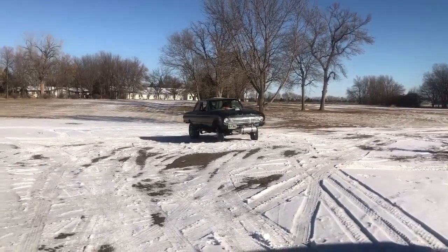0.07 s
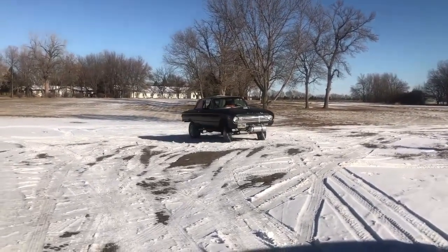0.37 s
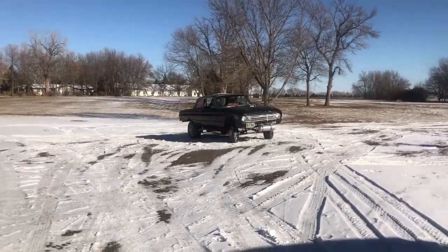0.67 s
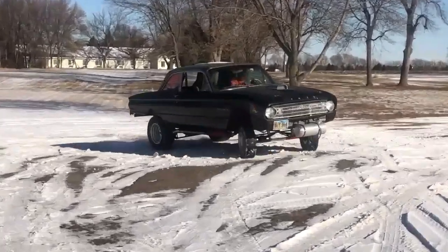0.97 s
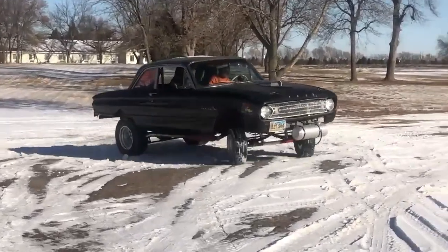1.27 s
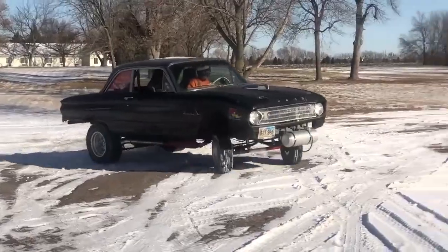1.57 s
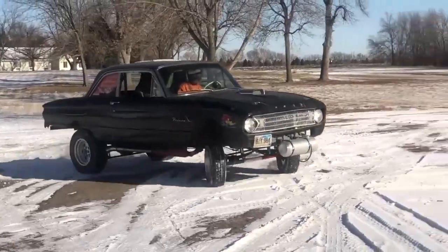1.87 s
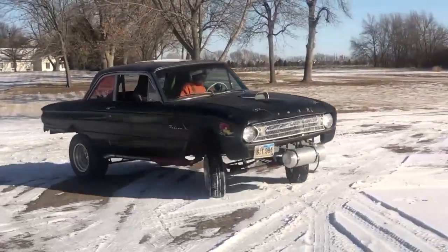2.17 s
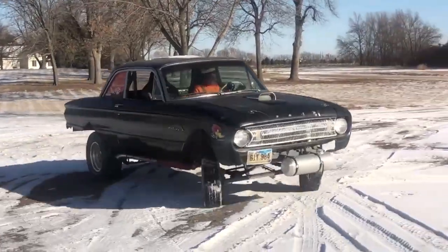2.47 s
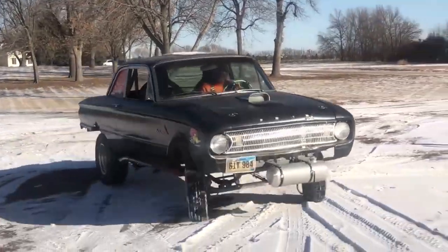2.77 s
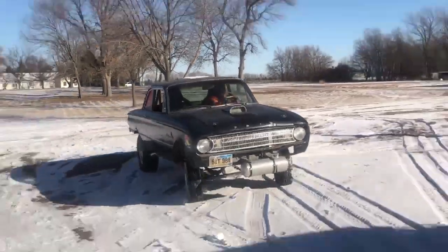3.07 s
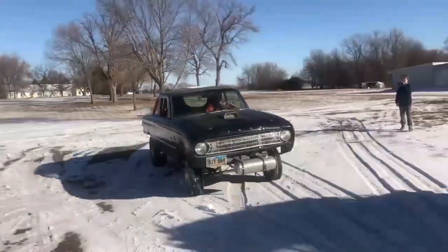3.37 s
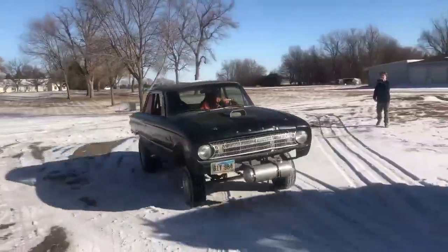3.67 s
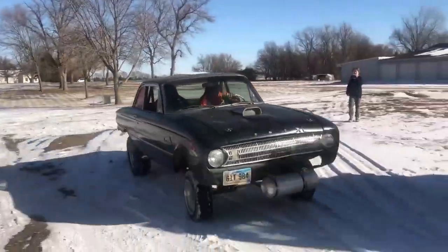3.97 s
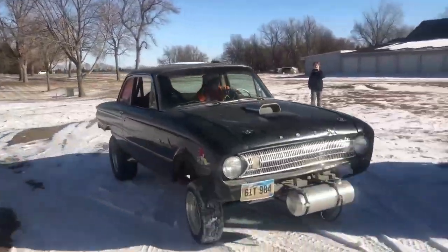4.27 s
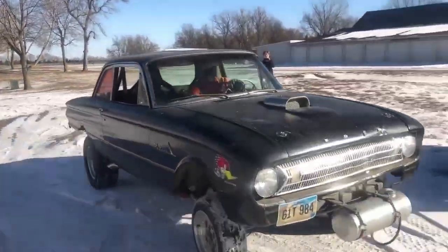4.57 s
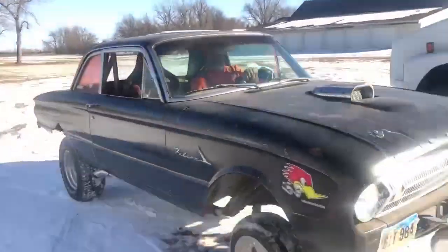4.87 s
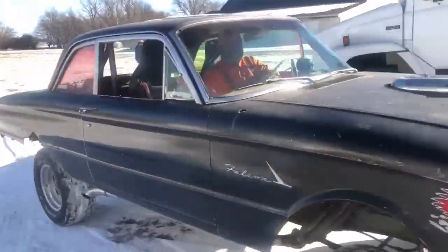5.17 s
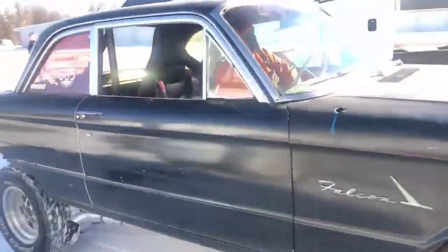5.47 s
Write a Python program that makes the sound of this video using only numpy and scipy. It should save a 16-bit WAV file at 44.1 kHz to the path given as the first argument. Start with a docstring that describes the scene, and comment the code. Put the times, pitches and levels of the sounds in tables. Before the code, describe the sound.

Outdoors on snow, a car engine growls at a distance, then falls to an uneven, burbling idle. With a little throttle it creeps right up to the stationary microphone, so the low throb, valve clatter, intake hiss and small exhaust spits become stronger. A thin whine and light cracks of frozen snow under the tyres sit beneath it. Near the end come a few dull knocks and a faint rumble of wind.

```python
"""A snowy yard, one fixed microphone: an old V8 car rolls slowly in from 13 m and draws alongside at 2.3 m.
It pulls, drops to a lumpy idle, then crawls on. Unequal firings throb and rasp in the exhaust,
gas spits from a leaking joint, the valves tick and clatter, fan and intake hiss and a pump whines.
Close up there are a few dull knocks. The tyres scuff and crack the snow crust,
and a faint wind buffets the microphone."""
import sys
import numpy as np
from scipy import signal
from scipy.fft import rfft, irfft, next_fast_len
from scipy.io import wavfile

SR = 44100
rng = np.random.default_rng(int(sys.argv[2]) if len(sys.argv) > 2 else 0)


def int16_out(signal):
    """Quantize to a 16-bit WAV file."""
    q = np.round(np.clip(np.atleast_2d(signal).T, -1, 1) * 32767)
    wavfile.write(sys.argv[1], SR, q.astype(np.int16))


N = 252693
TIME = np.arange(N) / SR

# the engine pulls, idles, then crawls: (time [s], speed [rpm])
ENGINE_SPEED = [(0, 1715), (.2, 1760), (.35, 1730), (.5, 1797), (.72, 1713), (.97, 1803), (1.1, 1772),
                (1.23, 1830), (1.4, 1755), (1.57, 1840), (1.73, 1691), (1.87, 1735), (2.03, 1680),
                (2.11, 1470), (2.2, 1430), (2.3, 1127), (2.8, 1015), (3.02, 1114), (3.16, 975),
                (3.48, 1331), (3.66, 1235), (3.83, 1328), (4.1, 1219), (4.2, 1085), (4.35, 1255),
                (4.6, 1247), (4.8, 1266), (5.3, 1258), (5.45, 1223), (5.73, 1215)]
def engine_cycle(hunt_cycles=.003, hunt_per_s=9):
    """Count of four-stroke cycles, two turns each, and their rate; the engine hunts ahead and behind."""
    cycle_hz = in_time(ENGINE_SPEED)[0] / 120
    return np.cumsum(cycle_hz) / SR + hunt_cycles * drift(hunt_per_s), cycle_hz


# unequal pulses in firing order; under load one bank stands out: (pulling [dB], otherwise [dB])
CYLINDERS = [(-9, -1.1), (0, 0), (-10, -4.6), (-5, -3.6), (0, -.2), (-11, -2.5), (1.5, -5.8), (1, -1.3)]
def firings(cycle, scatter_db):
    """Eight clicks a cycle, each scattered around its cylinder's mean strength."""
    slot = np.floor(cycle * len(CYLINDERS)).astype(int)
    onsets = np.flatnonzero(np.diff(slot)) + 1
    cylinder_db = np.mean(CYLINDERS, axis=1)[slot[onsets] % len(CYLINDERS)]
    clicks = np.zeros(N)
    clicks[onsets] = from_db(cylinder_db + scatter_db * rng.standard_normal(1000)[:len(onsets)])
    return clicks


# how the car is driven, the rest being crawling: (time [s], pulling [0-1], idling [0-1], unevenness [dB])
DRIVE = [(2.03, 1, 0, -20), (2.3, 0, 1, -7), (3.2, 0, 1, -7), (3.45, 0, 0, -16), (4.15, 0, 0, -12),
         (4.45, 0, 0, -21), (5.25, 0, 0, -21), (5.5, 0, 0, -12)]
# the exhaust's low boom at the microphone: (time [s], relative level [dB])
BOOM = [(0, -15), (2.03, -15), (2.17, -17), (2.3, -26), (3.2, -23), (3.42, -15), (3.7, -17), (3.87, -16),
        (4.17, -20.5), (4.36, -15), (4.65, -15), (4.98, -11), (5.33, -11), (5.45, -11.5), (5.73, -14)]
# the throb falters: (time [s], depth [dB], half width [s])
STUMBLES = [(2.095, 11, 0.022), (5.378, 11, .012)]
def exhaust(cycle, cycle_hz, tone_db=-.48, lumps_db=4.5, lope_db=2.2, lope_phase=.78):
    """The tailpipe's steady throb and uneven lumps; under load the growl swells once a cycle."""
    pull, idle, uneven_db = in_time(DRIVE)
    lope = pull * np.cos(2 * np.pi * (cycle - lope_phase))
    growl_db = at_microphone_db(-20.5, idle_db=-8.5, pull_db=9, falloff=.8651, side_db=2.5)
    growl = from_db(growl_db + lope_db * lope)
    boom = from_db(in_time(BOOM)[0])
    uneven = np.clip(from_db(uneven_db), 0, .9)
    even = np.sqrt(1 - uneven ** 2)
    tone = from_db(tone_db) * even * exhaust_tone(cycle, cycle_hz, pull, idle, boom, growl)
    lumps = from_db(lumps_db) * uneven * np.hypot(boom, growl) * exhaust_lumps(cycle)
    falter_db = sum(depth * np.exp(-((TIME - s) / width) ** 2) for s, depth, width in STUMBLES)
    return (tone + lumps) * from_db(-falter_db)


# balance of the exhaust's harmonics: (multiple of the cycle rate, pulling [dB], idling [dB], crawling [dB])
HARMONICS = [(5, -7, -31, -22), (8, 5.5, -7.5, -1.5), (9, -14.5, -37, -17), (10, -25, -10.5, -10),
             (11, -7, -9, -8.5), (12, -24, -8, -21), (13, -12.5, -3.5, -16), (14, -19.5, -9, -13.5),
             (15, -10.5, -11, -25), (16, -19, -33, -41), (17, -24, -25, -12), (18, -30, -37, -15.5),
             (19, -15, -26, -17), (20, -23.5, -17, -32), (21, -21, -18, -7), (22, -29, -0.5, -18),
             (23, -29, -9, -20), (25, -42, -23, -19), (26, -30, -21, -20), (31, -36, -26, -55),
             (32, -29, -14, -30)]
def exhaust_tone(cycle, cycle_hz, pull, idle, boom, growl, muffler_hz=128, boom_edge_hz=140):
    """The exhaust's repeating part: unequal cylinders and the muffler set how its harmonics line up."""
    throb_lead_s, burble_rad_per_100_hz = .007, .16
    cycle = cycle + throb_lead_s * (1 - pull) * cycle_hz   # slightly earlier when not pulling
    muffler_q = .55 + 12 * (1 - pull)   # strong gas flow damps the muffler
    pattern = np.fft.fft(from_db(CYLINDERS), axis=0)
    drive_shares = np.clip([pull, idle, 1 - pull - idle], 0, 1)
    bands, power = np.zeros((2, N)), np.zeros((2, N))   # boom below the edge, growl above
    for multiple, *levels_db in HARMONICS:
        k = round(multiple)
        hz = k * cycle_hz
        gain = from_db(levels_db) @ drive_shares
        loaded, light = pattern[k % len(pattern)]
        phase = np.angle(light) + pull * np.angle(loaded / light)
        phase -= np.arctan(muffler_q * (hz / muffler_hz - muffler_hz / hz))
        phase += .71 * idle * drift(3.8)   # at idle the firings do not keep time
        phase += burble_rad_per_100_hz * hz / 100 * pull * drift(17)   # under load no cycle repeats
        waver_db = (1.2 + .9 * idle) * drift(7.6)
        wave = gain * from_db(waver_db) * np.cos(2 * np.pi * k * cycle + phase)
        growl_share = np.clip((hz - boom_edge_hz) / 20 + .5, 0, 1)
        for band, share in enumerate((1 - growl_share, growl_share)):
            bands[band] += share * wave
            power[band] += share * gain ** 2 / 2
    return boom * bands[0] / np.sqrt(power[0]) + growl * bands[1] / np.sqrt(power[1])


# exhaust pipe resonances: (pitch [Hz], width [Hz], relative level [dB])
PIPE_MODES = [(50, 41, -13.5), (96.7, 22.7, -1), (104.6, 14.7, 0), (147, 40, -7), (181.8, 49.4, -1.5),
              (217.6, 33.5, -6), (293.7, 16.7, -11.5)]
def exhaust_lumps(cycle, muffler_band_hz=(45, 330)):
    """No two firings burn alike: their surplus or lack rings the pipe."""
    pulses = firings(cycle, scatter_db=2) * np.tanh(2 * rng.standard_normal(N))
    pipe = sum((-1) ** i * from_db(db) * resonate(pulses, hz, width)
               for i, (hz, width, db) in enumerate(PIPE_MODES))
    return unit_power(butterworth(pipe, 4, muffler_band_hz, "band"))


# colour of the gas in the pipe: (frequency [Hz], relative level [dB])
RASP_COLOUR = [(200, 12.5), (300, 3.5), (450, 0), (640, 0), (820, -11.5), (1050, -20), (1600, -24),
               (3000, -60)]
# the rasp builds as the car pulls: (time [s], added level [dB])
RASP_SWELL = [(.8, -2.5), (1.3, 1.5), (2.0, 2), (2.3, 0)]
def exhaust_rasp(cycle, bark_db=4, bark_phase=.84, narrowness=9):
    """Gas rasps in the pipe; under load one firing a cycle barks above the others."""
    pull = in_time(DRIVE)[0]
    bark = pull * np.exp(narrowness * (np.cos(2 * np.pi * (cycle - bark_phase)) - 1))
    db = at_microphone_db(-31, idle_db=0, pull_db=6.5, falloff=.9, side_db=0)
    db += in_time(RASP_SWELL)[0] + bark_db * bark
    return from_db(db) * puffs(cycle, RASP_COLOUR, steady=2.2, decay_s=.006, scatter_db=3)


# spits at a leaking exhaust joint, strongest close up: (time [s], relative level [dB], ring [Hz])
SPITS = [(.308, -28, 1150), (.373, -24.5, 1080), (.509, -25.5, 1130), (.578, -27, 1220),
         (.644, -23.5, 1080), (.713, -24, 1200), (.784, -26, 1100), (.81, -24, 1230), (.854, -19, 1120),
         (1.121, -22.5, 1100), (1.268, -25, 900), (1.32, -25, 1050), (2.945, -24, 1250), (3.846, -16, 1250),
         (4.437, -15.5, 1000), (4.542, -20, 950), (4.63, -12.5, 1050), (4.725, -12.5, 1000),
         (4.857, -14.5, 880), (5.01, -14.5, 1050), (5.105, -15.5, 780), (5.202, -11, 950),
         (5.296, -12, 950), (5.392, -12, 900), (5.452, -16, 1100), (5.49, -13, 920), (5.552, -17, 1200),
         (5.589, -12, 860), (5.686, -16, 1000)]
# colour of the escaping gas: (frequency [Hz], relative level [dB])
SPIT_COLOUR = [(250, -25), (550, 10), (950, 4), (1400, -18), (2200, -37), (6000, 15), (15000, -42)]
def joint_spits(decay_s=.0035, puff_db=-13, width_hz=160, soften_hz=2200):
    """Short, rounded puffs of gas escape; each rings the pipe wall at a pitch of its own."""
    wall = sum(ring(clicks_at([(s, db)]), hz, width_hz) for s, db, hz in SPITS)
    bursts = fade(clicks_at(np.array(SPITS)[:, :2]), decay_s)
    gas = from_db(puff_db) * bursts * noise(SPIT_COLOUR)
    return butterworth(wall + gas, 2, soften_hz, "low")


# valve cover resonances: (pitch [Hz], width [Hz], relative level [dB])
COVER_MODES = [(615, 65, -2.5), (745, 70, -3), (860, 60, -.5), (1010, 75, -.5), (1160, 65, -.5),
               (1285, 70, -2.5), (1570, 60, -5)]
def valve_ticks(cycle, scatter_db=4.5, exhaust_lag_cycles=.045):
    """An inlet and an exhaust valve tick at each firing, ringing each mode with random force and sign."""
    covers = 0
    for hz, width, db in COVER_MODES:
        ticks = firings(cycle, scatter_db) + firings(cycle - exhaust_lag_cycles, scatter_db)
        covers = covers + from_db(db) * ring(ticks * rng.choice([-1, 1], N), hz, width)
    level_db = at_microphone_db(-33.6, idle_db=-3, pull_db=1, falloff=1.05, side_db=-.5)
    return from_db(level_db) * unit_power(covers)


# colour of the valve gear: (frequency [Hz], relative level [dB])
CLATTER_COLOUR = [(500, -22), (800, -3), (1000, -5.5), (1280, 2), (1600, -2.5), (1900, -12), (2400, -13),
                  (4000, -70)]
def valve_clatter(cycle):
    """The valve gear clatters in step with the firings."""
    db = at_microphone_db(-33.5, idle_db=0, pull_db=3, falloff=.98, side_db=-4)
    return from_db(db) * puffs(cycle, CLATTER_COLOUR, steady=2.6, decay_s=.011, scatter_db=4)


# colour of fan and intake, heard from the front: (frequency [Hz], relative level [dB])
HISS_COLOUR = [(1120, -36), (1900, -0.5), (2190, -7.5), (2370, -4), (3060, -4), (3370, -1.5), (4540, -6.5),
               (5040, -6), (5910, -7.5), (10900, -8), (12500, -12.5), (14100, -14), (15600, -15)]
def fan_and_intake(cycle, swish_db=.7, flicker_db=.5, shade_hz=7040, shade_share=.54):
    """Air hisses with three swishes a cycle; alongside, the body hides some treble from the microphone."""
    db = at_microphone_db(-33.5, idle_db=-1, pull_db=2.06, falloff=1.0334, side_db=-2)
    db += swish_db * np.cos(6 * np.pi * cycle) + flicker_db * drift(25)
    hiss = from_db(db) * puffs(cycle, HISS_COLOUR, steady=6, decay_s=.0037, scatter_db=4.5)
    return hiss - shade_share * alongside() * butterworth(hiss, 1, shade_hz, "high")


# dull knocks from the car, within 4 m: (time [s], level [dB], ring [Hz])
KNOCKS = [(4.728, -23, 480), (5.125, -21, 720), (5.472, -14, 480), (5.532, -21, 620), (5.626, -21, 820)]
def knocks(width_hz=55):
    """Each blow rings one low, short resonance."""
    return sum(ring(clicks_at([(s, db)]), hz, width_hz) for s, db, hz in KNOCKS)


# the pump at the microphone: (time [s], level [dB])
PUMP_LEVEL = [(0, -55), (1.76, -53), (1.87, -46.5), (2.85, -48), (3.15, -42.5), (3.68, -41), (3.87, -53),
              (4.2, -46), (4.52, -41.5), (5.7, -50)]
# its pitch sags a little: (time [s], pitch [Hz])
PUMP_PITCH = [(3.3, 939), (4.5, 932)]
def pump(wobble_hz=2.6, flutter_db=1.6):
    """The pump gives a thin, nearly steady whine."""
    db = in_time(PUMP_LEVEL)[0] + flutter_db * drift(25.07)
    hz = in_time(PUMP_PITCH)[0] + wobble_hz * drift(30)
    return np.sqrt(2) * from_db(db) * np.sin(2 * np.pi * np.cumsum(hz) / SR)


# the loudest cracks under the tyres: (time [s], relative level [dB])
CRACKS = [(2.2378, -32), (2.3874, -31), (2.544, -30), (2.9023, -30.5), (3.7474, -27), (3.918, -24.5),
          (4.0143, -30), (4.3181, -17.5), (5.229, -25), (5.2624, -23.5), (5.553, -26), (5.6136, -26.5),
          (5.652, -26)]
# colour of the breaking crust: (frequency [Hz], relative level [dB])
CRUST_COLOUR = [(2000, -25), (6000, -9), (9500, -1.5), (13300, 0), (15600, -3)]
def snow_crust(rise_s=.0012, decay_s=.0045, crack_db=-4.5, grains_per_s=55, grain_db=-43, side_db=7):
    """The crust gives way in a few soft cracks and many faint grains that grow as the tyres come near."""
    scatter_db = 3 * np.clip(rng.standard_normal(N), -2, 2)
    size_db = grain_db + nearness_db() + side_db * alongside() + scatter_db
    grains = (rng.random(N) < grains_per_s / SR) * from_db(size_db)
    breaks = from_db(crack_db) * clicks_at(CRACKS) + grains
    return (fade(breaks, decay_s) - fade(breaks, rise_s)) * noise(CRUST_COLOUR)


# a scuff about 11 m off: (time [s], level [dB])
SCUFF_LEVEL = [(.7, -90), (.85, -56), (1.12, -55), (1.19, -46), (1.35, -58), (1.7, -90)]
# its colour: (frequency [Hz], relative level [dB])
SCUFF_COLOUR = [(2400, -25), (3250, 0), (3900, -1), (5000, -20)]
def tyre_scuff(grit_db=2.5):
    """A tyre scrubs briefly over the frozen ground."""
    return from_db(in_time(SCUFF_LEVEL)[0] + grit_db * drift(120)) * noise(SCUFF_COLOUR)


# gusts on the microphone: (time [s], level [dB])
GUSTS = [(0, -61), (3.3, -58), (5.0, -46), (5.63, -45), (5.7, -33)]
# their rumble: (frequency [Hz], relative level [dB])
WIND_COLOUR = [(12, -1), (25, 10), (45, 14), (90, -30), (300, -49)]
def wind():
    """Moving air buffets the microphone with a low rumble."""
    return from_db(in_time(GUSTS)[0]) * noise(WIND_COLOUR)


# the car's path across the yard: (time [s], distance from the microphone [m])
DISTANCE = [(0, 13), (1.3, 10.5), (2.4, 9.13), (3.4, 6.6), (4.15, 4.7), (5.05, 2.62), (5.73, 2.3)]
def nearness_db(reference_m=3):
    """Sound pressure halves as the distance doubles; 0 dB at the reference distance."""
    return 20 * np.log10(reference_m / in_time(DISTANCE)[0])


def alongside(passing_s=(4.91, 5.36)):
    """0 while the car's nose faces the microphone, 1 once its side does."""
    return np.interp(TIME, passing_s, [0, 1])


def at_microphone_db(crawl_db, idle_db, pull_db, falloff, side_db, throttle_lead_s=.1):
    """A part's level when crawling at 3 m, plus offsets for throttle, distance and being side-on."""
    idle_rpm, crawl_rpm, pull_rpm = 1065, 1332, 1520
    wanted_rpm = np.interp(TIME + throttle_lead_s, TIME, in_time(ENGINE_SPEED)[0])
    effort_db = np.interp(wanted_rpm, [idle_rpm, crawl_rpm, pull_rpm], [idle_db, 0, pull_db])
    return crawl_db + effort_db + falloff * nearness_db() + side_db * alongside()


def puffs(cycle, colour, steady, decay_s, scatter_db):
    """Noise that flares at every firing over a steady share, at unit power."""
    rush = noise(colour)
    flares = unit_power(fade(firings(cycle, scatter_db), decay_s))
    return unit_power(rush * (steady + flares))


def from_db(db):
    """Decibels to gain."""
    return 10 ** (np.asarray(db) / 20)


def unit_power(x):
    """Scale to a mean square of 1."""
    return x / np.sqrt(np.mean(x ** 2) + 1e-20)


def in_time(rows):
    """Each column of a curve at every sample."""
    s, *columns = np.transpose(rows)
    return [np.interp(TIME, s, column) for column in columns]


def drift(knots_per_s):
    """A random wander at unit power."""
    knots = rng.standard_normal(400)
    return unit_power(np.interp(TIME * knots_per_s, np.arange(len(knots)), knots))


def noise(colour):
    """Steady noise of the given spectral density, at unit power."""
    hz, db = np.transpose(colour)
    size = next_fast_len(N)
    bins_hz = np.maximum(np.fft.rfftfreq(size, 1 / SR), 1)
    gain = from_db(np.interp(np.log(bins_hz), np.log(hz), db, left=-90, right=-90))
    return unit_power(irfft(rfft(rng.standard_normal(size)) * gain, size)[:N])


def butterworth(x, order, hz, kind):
    """A low-, high- or band-pass filter."""
    return signal.sosfilt(signal.butter(order, hz, kind, fs=SR, output="sos"), x)


def resonate(x, hz, width_hz):
    """One resonance with gain 1 at its peak."""
    r, w = np.exp(-np.pi * width_hz / SR), 2 * np.pi * hz / SR
    return signal.lfilter(np.array([1, 0, -1]) * (1 - r * r) / 2, [1, -2 * r * np.cos(w), r * r], x + 1e-18)


def ring(clicks, hz, width_hz):
    """A unit click starts a dying sine of height 1."""
    r, w = np.exp(-np.pi * width_hz / SR), 2 * np.pi * hz / SR
    return signal.lfilter([0, np.sin(w)], [1, -2 * r * np.cos(w), r * r], clicks + 1e-18)


def fade(clicks, decay_s):
    """Every click jumps to its height and dies away."""
    return signal.lfilter([1], [1, -np.exp(-1 / (decay_s * SR))], clicks + 1e-18)


def clicks_at(events):
    """One click for each row of (time [s], level [dB])."""
    s, db = np.transpose(events)
    clicks = np.zeros(N)
    clicks[np.clip((s * SR).astype(int), 0, N - 1)] = from_db(db)
    return clicks


def scene():
    """Car, snow and wind at one microphone; exhaust, valves and fan share the engine's cycle."""
    cycle, cycle_hz = engine_cycle()
    tailpipe = exhaust(cycle, cycle_hz) + exhaust_rasp(cycle)
    engine_bay = valve_clatter(cycle) + fan_and_intake(cycle) + valve_ticks(cycle)
    car = tailpipe + engine_bay + joint_spits() + knocks() + pump()
    return (car + snow_crust() + tyre_scuff() + wind())[None]


def record(dry, ceiling=.75, cutoff_hz=15700):
    """The highest peaks are rounded and the top of the treble is cut."""
    rounded = dry / (1 + (dry / ceiling) ** 8) ** (1 / 8)
    return signal.sosfilt(signal.ellip(12, .1, 90, cutoff_hz, fs=SR, output="sos"), rounded)


dry = scene()
out = record(dry)
int16_out(out)
```